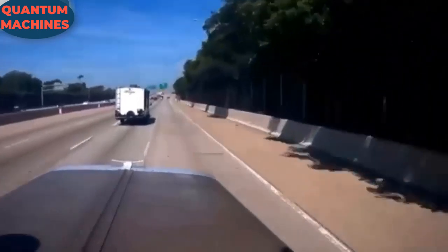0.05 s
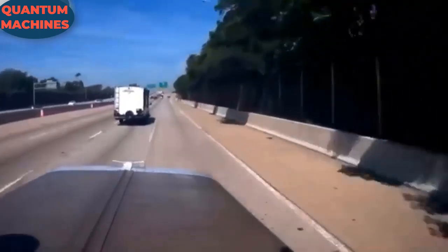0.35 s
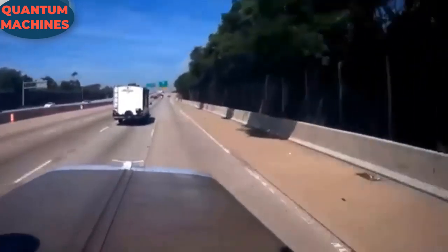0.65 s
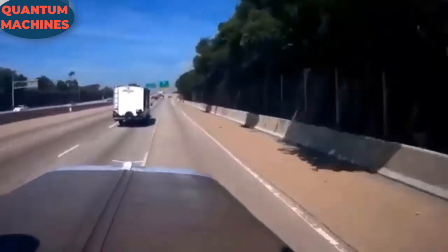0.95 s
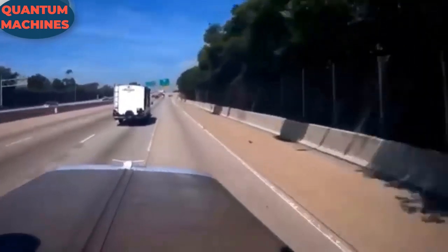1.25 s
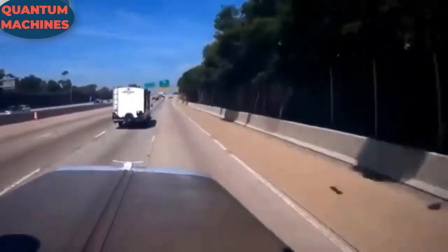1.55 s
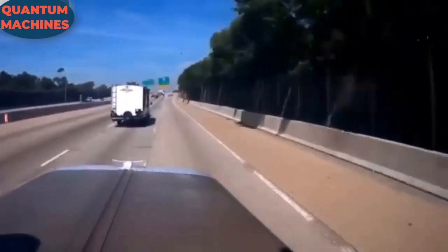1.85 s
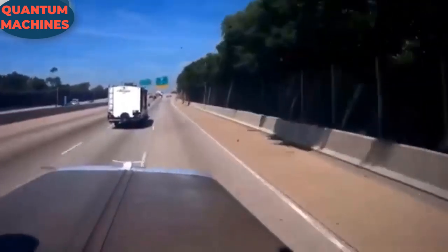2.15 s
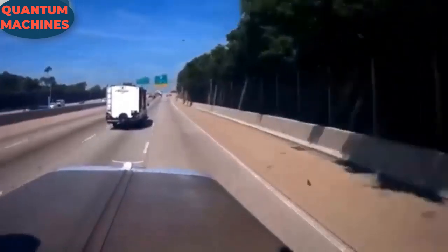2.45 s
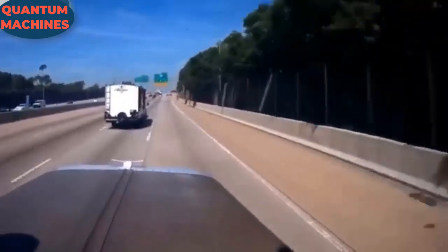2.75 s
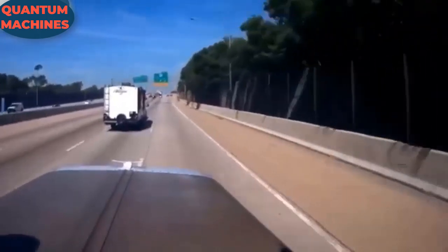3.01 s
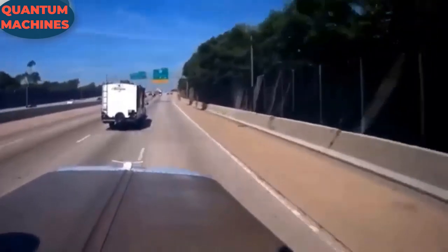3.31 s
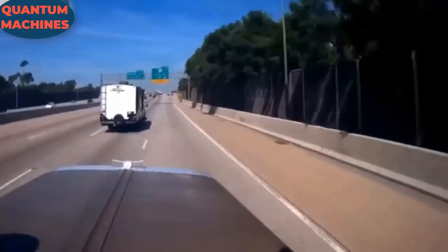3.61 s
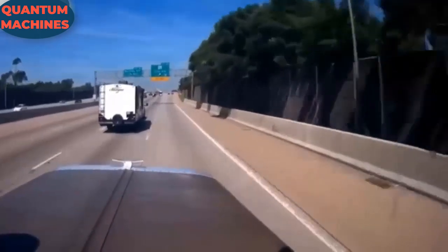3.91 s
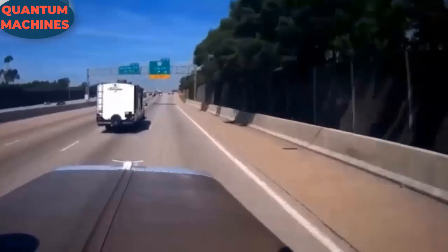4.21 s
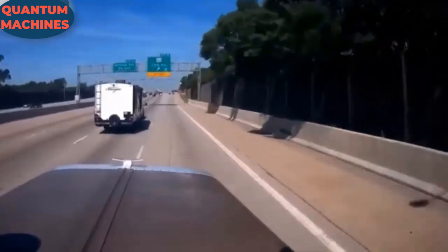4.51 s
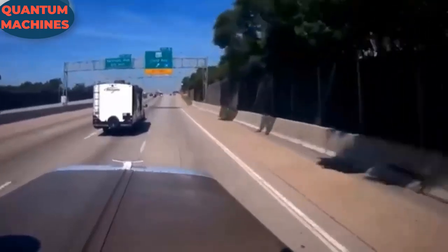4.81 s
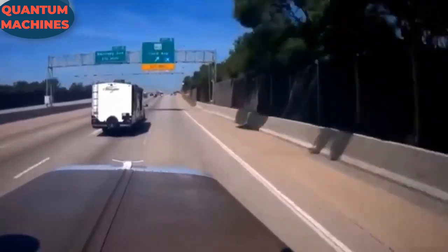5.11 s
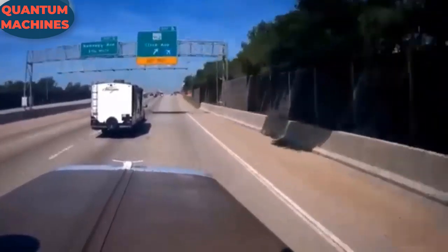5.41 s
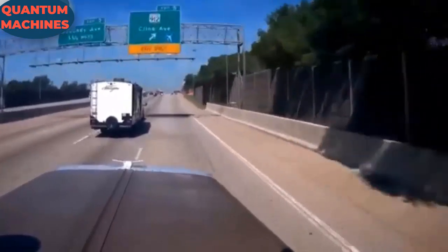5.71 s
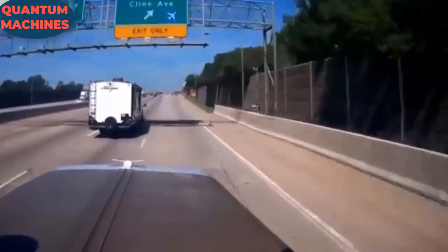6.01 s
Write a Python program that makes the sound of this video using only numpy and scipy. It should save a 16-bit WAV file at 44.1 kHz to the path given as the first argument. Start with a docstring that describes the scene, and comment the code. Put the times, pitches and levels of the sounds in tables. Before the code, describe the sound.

A truck's two-tone air horn blares three times, throbbing and raspy, over engine and highway rumble inside the cab.

```python
"""A truck at highway speed, heard through a microphone in its cab. Two air horns, reed-driven pipes a
major third apart, are sounding at the start and stop at 0.9 s. Gain control lets engine and road rumble
swell in the pause, as gusts thump, then ducks it under a second blast from 1.4 to 3.7 s. After more
gusts, a third blast holds from 4.2 s to the end while the diesel's upper orders take over. Throughout,
slow pressure buffets lean on the overloaded microphone, so the chord throbs and rasps."""
import sys
import numpy as np
from scipy import signal
from scipy.fft import rfft, irfft, next_fast_len
from scipy.io import wavfile
from scipy.ndimage import uniform_filter1d, minimum_filter1d, map_coordinates

SR = 44100
rng = np.random.default_rng(int(sys.argv[2]) if len(sys.argv) > 2 else 0)


def wav_record(signal):
    """Record a signal, one row per channel, as 16-bit PCM in the file named by sys.argv[1]."""
    frames = np.transpose(np.atleast_2d(signal))
    bounded = np.clip(frames, -1, 1)
    # unit amplitude maps onto the largest positive 16-bit level
    quanta = np.round(bounded * 32767).astype(np.int16)
    wavfile.write(sys.argv[1], SR, quanta)


N = 267246
KICK_DB, KICK_S = 6, 0.06  # the first rush of air in both trumpets: extra level, decay time


def horns():
    """Common air supply: two trumpets share one valve and sink in pitch as its pressure falls."""
    age, fade_db, sag_hz, bright_db, rise_s = valve()
    settled = ramp(age / rise_s) ** 2
    drain_hz = 1.4 * age  # the air tank empties
    scoop_hz = 3.5 * np.exp(-.5 * ((age - .098) / .03) ** 2)  # one dip just after the onset
    high_hz = 404.9 - drain_hz - sag_hz - scoop_hz
    low_hz = 324.2 + 8 * (1 - settled ** 2) - .15 * sag_hz  # sharp until settled
    high = high_trumpet(high_hz, age, fade_db, bright_db)
    low = low_trumpet(low_hz, age, fade_db - .5 * sag_hz, bright_db, settled)  # weakens as valve eases
    air = escaping_air(age)
    attack = ramp(age / .016)
    return attack * (high + low + amp(fade_db) * (rasp_flares(high_hz, low_hz) + air))


def valve():
    """Flow control: easing the valve flattens the pitch; once it shuts, the tone decays exponentially."""
    # pulls on the valve: opens t/s, shuts t/s, release T60/s, starts to ease t/s, fully eased t/s,
    # pitch sag/Hz, spectral tilt/(dB per octave), low trumpet's rise time/s
    blasts = np.array([(-.2, 0.891, 0.29, .6, 0.97, 7.5, 1.5, 0.093),
                       (1.415, 3.683, .14, 2.99, 3.53, 4.8, 1.6, .17),
                       (4.176, 6.3, .12, 4.3, 6, 1.1, 0, .11)])
    t = np.arange(N) / SR
    current = np.maximum(np.searchsorted(blasts[:, 0], t) - 1, 0)
    opens, shuts, t60, ease_from, ease_to, sag_hz, bright_db, rise_s = blasts[current].T
    fade_db = -60 * np.maximum(t - shuts, 0) / t60
    eased = ramp((t - ease_from) / (ease_to - ease_from))
    return np.abs(t - opens), fade_db, sag_hz * eased, bright_db + .2 * fade_db, rise_s  # fading dulls


def high_trumpet(hz, age, fade_db, bright_db):
    """Onset transient: the shorter pipe speaks at once, louder and duller at first; its reed spits."""
    # harmonic spectrum: harmonic number, relative level/dB
    harmonics = [(1, 3), (2, 0.75), (3, -12.5), (4, -53), (5, -46), (6, -58.5), (7, -57.5), (8, -51),
                 (9, -49)]
    # spits of the reed: t/s, level/dB
    spit_events = [(1.431, -29), (1.455, -35), (4.201, -30)]
    # spectrum of a spit: f/Hz, relative level/dB
    spit_spectrum = [(500, -12.5), (1250, 13), (1650, -3), (2020, 6.5), (2500, -5), (3800, -10),
                     (5000, -20), (14000, -36.5)]
    kick = np.exp(-age / KICK_S)
    tone = trumpet(hz, harmonics, bright_db - 5 * kick, fundamental_db=0,
                   flutter_db=1, rasp_db=-25, dispersion=.64)
    spit = buzz(hz, spit_spectrum, jitter=.018, noise_share=.3)
    spit_envelope = bumps([(s, .011, amp(db)) for s, db in spit_events])
    return amp(fade_db) * (amp(-20.5 + KICK_DB * kick) * tone + spit * spit_envelope)


def low_trumpet(hz, age, fade_db, bright_db, settled):
    """Build-up of resonance: the longer pipe starts slowly and sounds thin until it settles."""
    # harmonic spectrum: harmonic number, relative level/dB
    harmonics = [(1, -11), (2, 5.5), (3, 2), (4, -29), (5, -36), (6, -37.5), (7, -50), (8, -50), (9, -54.5)]
    # boost of the fundamental: t/s, level/dB
    fundamental_boost = [(0, 2.5), (2.7, -6.5), (3.5, 10.5), (4.5, 11.5), (6.06, 11)]
    fundamental_db, = curves(fundamental_boost)
    tone = trumpet(hz, harmonics, bright_db + 4.5 * (1 - settled), fundamental_db,
                   flutter_db=.5, rasp_db=-21, dispersion=.3)
    return settled * amp(-24 + KICK_DB * np.exp(-age / KICK_S) + fade_db) * tone


def trumpet(hz, harmonics, bright_db, fundamental_db, flutter_db, rasp_db, dispersion, jitter=.0025):
    """Harmonic series: a reed drives a flared pipe and lets a puff of air noise through each cycle."""
    # spectrum of the puffs: f/Hz, relative level/dB
    puff_spectrum = [(300, -9.5), (900, 8), (1400, -6), (1900, -12), (2500, -21.5), (3600, -18),
                     (4500, -33), (12000, -58.5)]
    phase = 2 * np.pi * np.cumsum(hz * (1 + jitter * wobble(120))) / SR
    wave, power = np.zeros(N), np.zeros(N)
    for k, db in harmonics:
        strength = amp(db + fundamental_db * (k == 1) + bright_db * np.log2(k))
        power += strength ** 2 / 2
        flutter = amp(flutter_db * np.sqrt(k) * wobble(14))
        wave += strength * flutter * np.cos(k * phase + dispersion * k * k)  # the flare smears pulses
    puffs = (1 + np.cos(phase)) * noise(puff_spectrum, grain_db=2)
    return -(wave / np.sqrt(power) + amp(rasp_db) * puffs)


def rasp_flares(high_hz, low_hz):
    """Amplitude modulation: a buzzy 2-4 kHz rasp flares briefly over the chord, a few times strongly."""
    # spectrum of the rasp: f/Hz, relative level/dB
    spectrum = [(1200, -18), (2100, 6), (3000, -2.5), (3900, -5.5), (4600, -23.5), (12000, -33.5)]
    # stronger bursts of rasp: t/s, level/dB
    bursts = [(0.289, -49), (0.499, -47.5), (.81, -49), (1.511, -43), (1.711, -47.5), (1.781, -44.5),
              (1.96, -47), (2.73, -51.5), (3.16, -53.5), (3.349, -51.5), (5.121, -51)]
    rasp = unit(sum(buzz(hz, spectrum, jitter=.003, noise_share=.29) for hz in (high_hz, low_hz)))
    return rasp * (amp(-65.5 + 6.1 * wobble(17)) + bumps([(s, .017, amp(db)) for s, db in bursts]))


def buzz(hz, spectrum, jitter, noise_share):
    """Pulse excitation: one sharp, uneven pulse a cycle, filtered and mixed with noise."""
    cycles = np.cumsum(hz * (1 + jitter * wobble(300))) / SR
    pulses = np.sinc((cycles % 1 - .5) * SR / hz / 2) * amp(2 * wobble(300))
    pitched = unit(coloured(pulses - pulses.mean(), spectrum))
    return np.sqrt(1 - noise_share) * pitched + np.sqrt(noise_share) * noise(spectrum, grain_db=4.5)


def escaping_air(age):
    """Flow noise: escaping air hisses, most just after the valve opens."""
    # spectrum of the hiss: f/Hz, relative level/dB
    spectrum = [(2000, -20), (3600, 2), (4300, -3), (5500, -1), (8000, -6), (11000, -11), (15000, -9.5)]
    rush_db = 7.5 * np.exp(-age / .46)
    return amp(-68.5 + rush_db + 1.9 * wobble(12)) * noise(spectrum, grain_db=5.5)


def buffeting():
    """Infrasound: cab pressure flutters at random, giving way to hard suctions flanked by pushes."""
    # the hardest buffets: t/s, relative suction
    buffets = [(.073, .24), (0.209, .3), (.359, .2), (.808, .29), (1.743, .3), (1.814, .24), (2.738, .33),
               (2.975, 0.18), (3.157, 0.34), (3.248, 0.21), (3.364, 0.22), (3.448, 0.39), (3.525, .34),
               (4.365, 0.36), (4.584, .4), (4.658, 0.24), (4.768, .28), (5.223, 0.22), (5.529, .31),
               (5.621, 0.3), (5.777, 0.22), (5.941, .32)]
    # spectrum of the flutter: f/Hz, relative level/dB
    spectrum = [(5, -30), (10, -10), (13.3, 0), (16, -6), (35, -22), (120, -70), (400, -120)]
    width_s, gap_s = .012, .033
    flutter = .13 * np.tanh(noise(spectrum, grain_db=0))
    lulls = np.minimum(bumps([(s, .03, 1) for s, _ in buffets]), 1)
    suction = bumps([(s, width_s, size) for s, size in buffets])
    push_before = bumps([(s - gap_s, width_s, .67 * size) for s, size in buffets])
    push_after = bumps([(s + .94 * gap_s, width_s, .46 * size) for s, size in buffets])
    return (1 - lulls) * flutter + push_before - suction + push_after


def engine():
    """Engine orders: the diesel drones on multiples of its shaft speed; the upper ones take over late."""
    # crankshaft rotation: t/s, f/Hz
    shaft_speed = [(0, 28.1), (1.5, 28.4), (3, 28.5), (4, 28.5), (4.7, 28.2), (6.06, 28.1)]
    # the diesel pulls harder, then eases: t/s, level/dB
    load = [(0, -4.5), (1.2, -0.5), (3, 2), (4.5, 0)]
    # orders: multiple of shaft speed, early relative level/dB, late relative level/dB
    orders = [(3, -35.5, -40.5), (6, -34, -61), (8, -49.5, -39), (9, -72.5, -48.5), (10, -51.5, -41)]
    shaft_hz, = curves(shaft_speed)
    load_db, = curves(load)
    late, = curves([(4.1, .028), (4.55, .99)])
    phase = 2 * np.pi * np.cumsum(shaft_hz * (1 + .014 * wobble(30))) / SR
    drone = np.zeros(N)
    for k, early_db, late_db in orders:
        level_db = early_db + late * (late_db - early_db) + 2 * wobble(16)
        drone += amp(level_db) * np.sin(k * phase + rng.uniform(0, 2 * np.pi))
    return np.sqrt(2) * amp(load_db) * drone


def driveline(hz, db):
    """Forced vibration: the spinning driveshaft shakes the cab with one deep, unsteady note."""
    swell_db = 2.5 * wobble(12)
    phase = 2 * np.pi * np.cumsum(hz * (1 + .025 * wobble(12))) / SR
    return np.sqrt(2) * amp(db + swell_db) * np.sin(phase)


def road():
    """Broadband excitation: tyres and wind make the cab boom and drone."""
    # road and wind: t/s, boom level/dB, drone level/dB
    levels = [(0, -28.5, -37), (.7, -29, -34), (1, -31, -35), (1.33, -32, -28.5), (1.6, -29, -35),
              (3, -24, -37), (3.85, -21.5, -32), (4.05, -29.5, -33.5), (4.15, -22, -28.5), (4.5, -29, -36),
              (6.06, -29, -35)]
    # spectrum of the boom: f/Hz, relative level/dB
    boom_spectrum = [(15, 6.5), (30, 20.5), (50, 2.5), (65, 4), (110, 3), (180, -9), (400, -33.5),
                     (1000, -57.5), (6000, -120)]
    # spectrum of the drone: f/Hz, relative level/dB
    drone_spectrum = [(60, -6.5), (150, 1.5), (310, 6), (480, -9.5), (1050, -12.5), (1500, -38),
                      (2400, -45), (3250, -44), (3600, -34.5), (4300, -54), (5500, -48), (8000, -60),
                      (15000, -70)]
    boom_db, drone_db = curves(levels)
    lumps_db = 1.2 * wobble(18)
    boom = amp(boom_db + lumps_db) * noise(boom_spectrum, grain_db=-.5)
    drone = amp(drone_db + lumps_db) * noise(drone_spectrum, grain_db=0)
    return boom + drone


def gusts():
    """Turbulence: each gust strikes the cab with a thump and a sputtering hiss."""
    # gusts: t/s, half-width/s, thump level/dB, hiss level/dB
    hits = [(0.944, 0.02, -23.5, -61.5), (1.069, .018, -28, -63.5), (1.139, 0.027, -30, -58.5),
            (1.278, .035, -24.5, -69.5), (1.365, 0.011, -29, -51), (3.758, .03, -22.5, -60),
            (3.879, .018, -21, -60), (3.98, .018, -16, -58), (4.129, 0.02, -25, -56.5)]
    # spectrum of the hiss: f/Hz, relative level/dB
    hiss_spectrum = [(1000, -10), (2200, -4), (3600, 2), (4300, -3), (5500, 0), (8000, -2), (11000, -9),
                     (15000, -12)]
    # spectrum of the thump: f/Hz, relative level/dB
    thump_spectrum = [(20, -6), (45, 0), (110, -1), (250, -11), (500, -25), (1100, -31),
                      (2000, -55), (6000, -120)]
    thumps = noise(thump_spectrum, grain_db=0) * bumps([(s, width, amp(db)) for s, width, db, _ in hits])
    hiss = noise(hiss_spectrum, grain_db=5.5) * bumps([(s, width, amp(db)) for s, width, _, db in hits])
    return thumps + hiss


def microphone(x, bend, low_hz):
    """Intermodulation: the capsule yields more to suction, so buffets swing its gain; sum tones arise."""
    bent = (1 - np.exp(-bend * x)) / bend
    return filtered(bent, lambda hz: (1j * hz / (low_hz + 1j * hz)) ** 2)  # second-order high-pass


def gain_control(x, target_db, boost_db, attack_s, release_s):
    """Compression: gain drops quickly when the sound is loud and creeps back when it is quiet."""
    hop = 128
    power = np.abs(uniform_filter1d(x ** 2, size=441))[::hop]
    wanted_db = np.minimum(target_db - 10 * np.log10(power + 1e-9), boost_db)
    gain_db = [0]
    for goal in wanted_db[:-1]:
        lag_s = attack_s if goal < gain_db[-1] else release_s
        gain_db.append(gain_db[-1] + (goal - gain_db[-1]) * hop / SR / lag_s)
    return x * amp(np.interp(np.arange(N), np.arange(len(wanted_db)) * hop, gain_db))


def limiter(x, ceiling):
    """Peak limiting: brief, smoothed dips in gain hold the peaks at the ceiling."""
    needed = np.minimum(1, ceiling / (np.abs(x) + 1e-9))
    return x * uniform_filter1d(minimum_filter1d(needed, size=133), size=133)


def crackle(x, depth, tick_db, fizz_db):
    """Overload noise: troughs of the wave fizz softly, and those near full depth tick."""
    # spectrum of the microphone's crackle: f/Hz, gain/dB
    spectrum = [(1000, -11), (2000, -1.5), (3500, -6), (4200, -3), (4700, 4.5), (7000, -3.5), (10000, -12),
                (15000, -15.5)]
    troughs = signal.find_peaks(-x, height=.2)[0]
    scatter_db = 6 * np.minimum(rng.standard_normal(N), 1.5)
    nearness = np.minimum(-x[troughs] / depth, 1) ** 7
    ticks = np.zeros(N)
    ticks[troughs] = amp(tick_db + scatter_db[troughs]) * nearness
    fizz = amp(fizz_db + 3.4 * wobble(24)) * np.minimum(x, 0) ** 2 * rng.standard_normal(N)
    return coloured(ticks + fizz, spectrum)


def amp(db):
    """Amplitude ratio of a level in decibels."""
    return 10 ** (np.asarray(db) / 20)


def unit(x):
    """Normalisation to rms 1."""
    return x / np.sqrt(np.mean(x ** 2) + 1e-20)


def ramp(x):
    """Raised-cosine step as x goes from 0 to 1."""
    return np.sin(np.pi / 2 * np.clip(x, 0, 1)) ** 2


def curves(rows):
    """Linear interpolation: one value per sample for each column after t/s."""
    times, *columns = np.transpose(rows)
    return [np.interp(np.arange(N) / SR, times, column) for column in columns]


def wobble(rate):
    """Random modulation: a spline through rate Gaussian knots a second."""
    end = N * rate / SR
    grid = np.arange(0, end + 1, 1 / 8)
    knots = rng.standard_normal(int(end) + 4)
    return np.interp(np.linspace(0, end, N), grid, map_coordinates(knots, [grid]))


def bumps(rows):
    """Gaussian pulses, one for each row of t/s, half-width/s, height."""
    t, pulses = np.arange(N) / SR, np.zeros(N)
    for s, width, height in rows:
        near = slice(*np.searchsorted(t, [s - 6 * width, s + 6 * width]))
        pulses[near] += height * np.exp(-.5 * ((t[near] - s) / width) ** 2)
    return pulses


def filtered(x, response):
    """Linear filtering: the spectrum of x times a frequency response."""
    size = next_fast_len(N + SR // 2)
    return irfft(rfft(x, size) * response(np.fft.rfftfreq(size, 1 / SR)), size)[:N]


def coloured(x, spectrum):
    """Spectral shaping by points of f/Hz, gain/dB, joined on a log frequency axis."""
    f, db = np.transpose(spectrum)
    return filtered(x, lambda hz: amp(np.interp(np.log(hz + 1), np.log(f), db)))


def noise(spectrum, grain_db):
    """Coloured noise of rms 1, clumped into grains by fast amplitude modulation."""
    return unit(coloured(rng.standard_normal(N) * amp(grain_db * wobble(400)), spectrum))


def scene():
    """Superposition: the pressures of all sources add in the cab."""
    cab = horns() + engine() + driveline(hz=47.17, db=-29.5) + road() + gusts() + buffeting()
    fade_in, = curves([(0, 0), (.004, 1)])
    return (cab * fade_in)[None]


def record(dry):
    """Nonlinear transduction: overloaded microphone, gain control, limiter, crackle and band limit."""
    x = microphone(dry[0], bend=1.97, low_hz=32)
    x = gain_control(x, target_db=-17, boost_db=18, attack_s=.094, release_s=.3)
    x = limiter(x, ceiling=.46)
    x = x + crackle(x, depth=.43, tick_db=-29.5, fizz_db=-41)
    return filtered(x, lambda hz: hz < 15200)[None]


dry = scene()
out = record(dry)
wav_record(out)
```